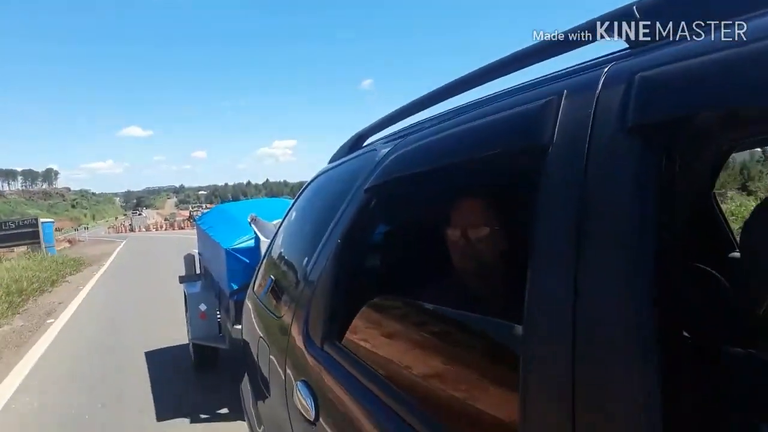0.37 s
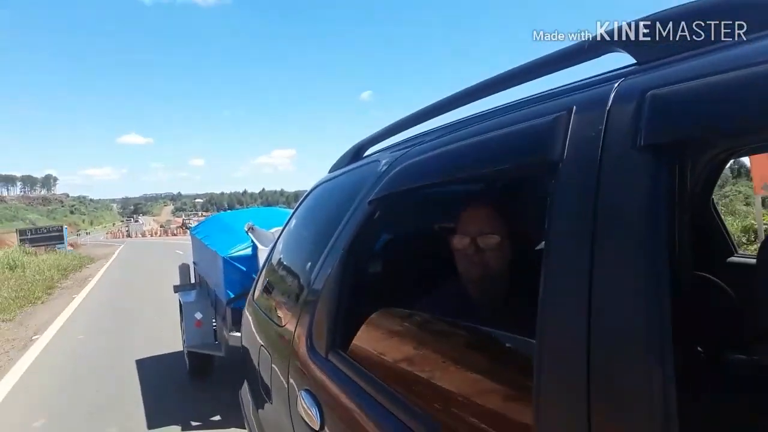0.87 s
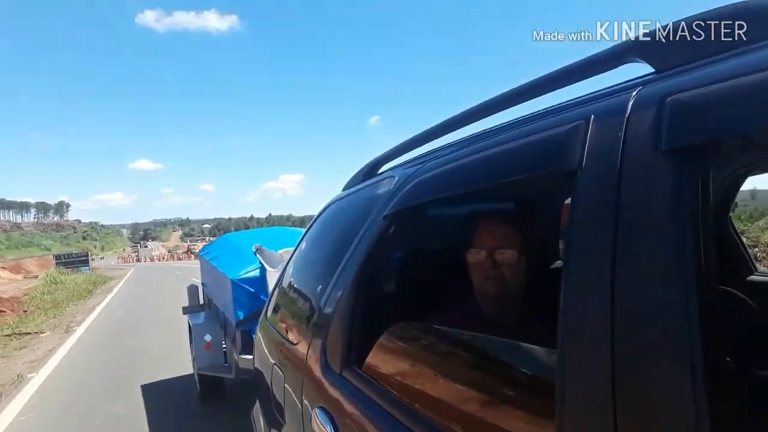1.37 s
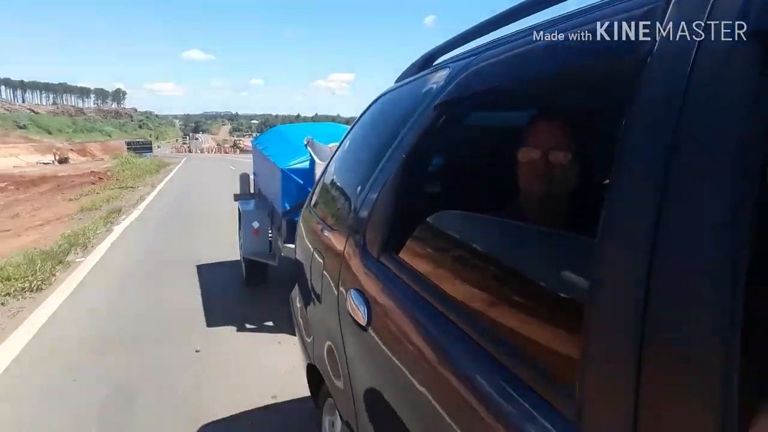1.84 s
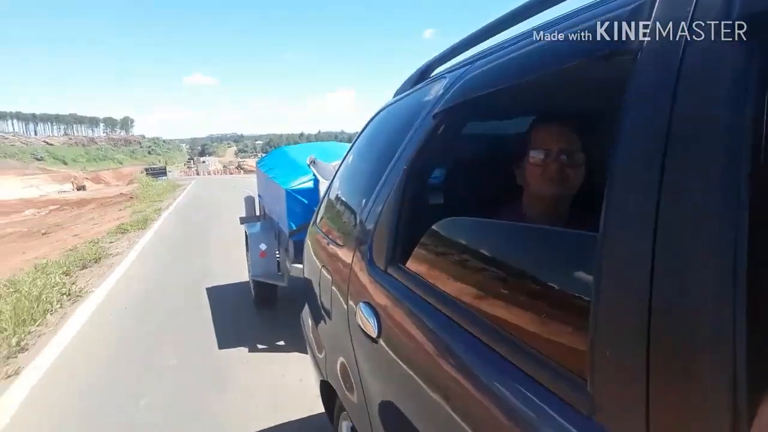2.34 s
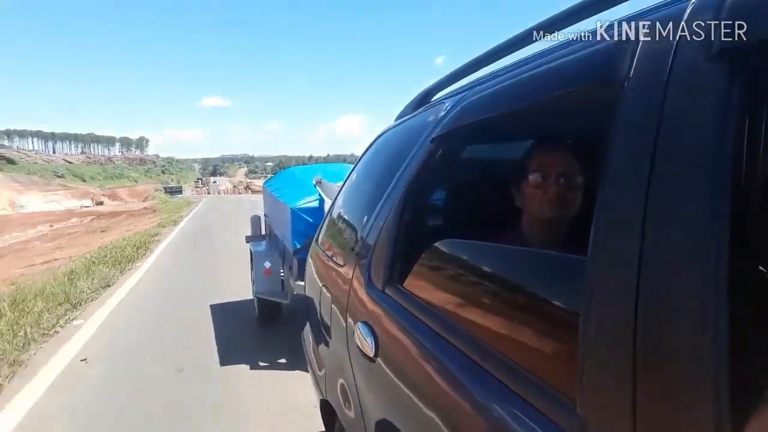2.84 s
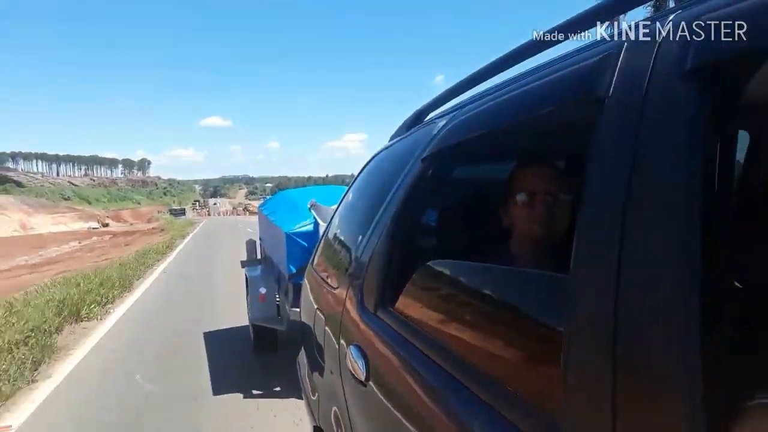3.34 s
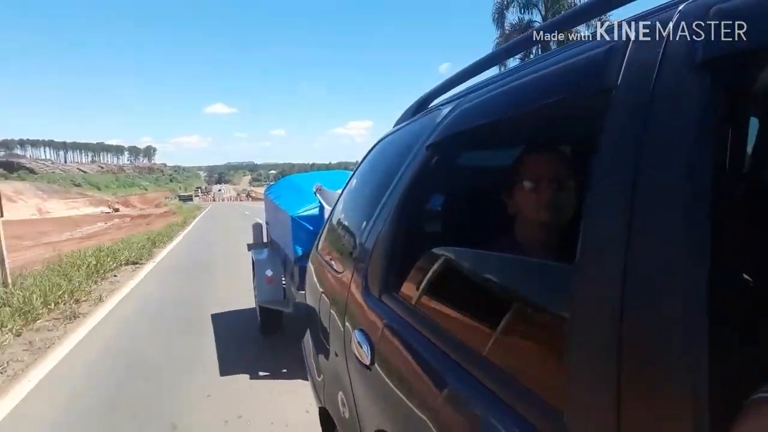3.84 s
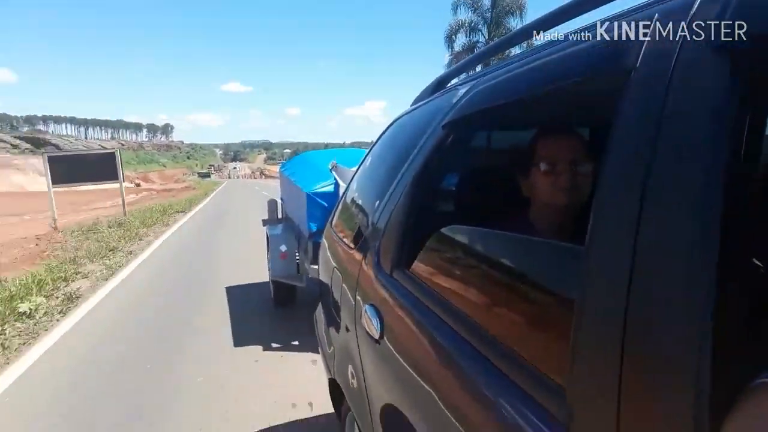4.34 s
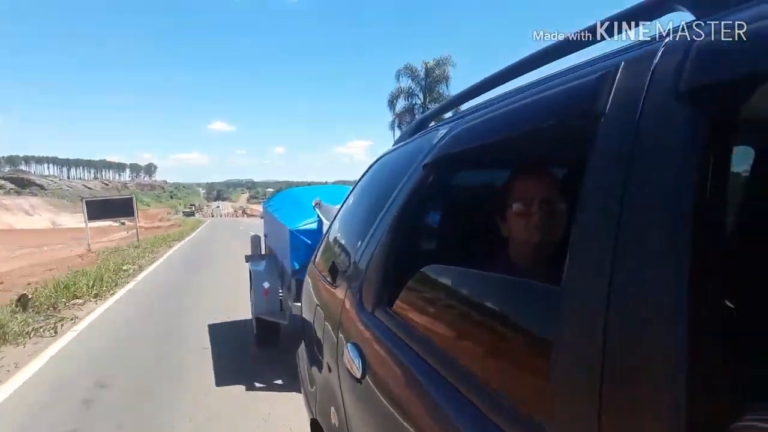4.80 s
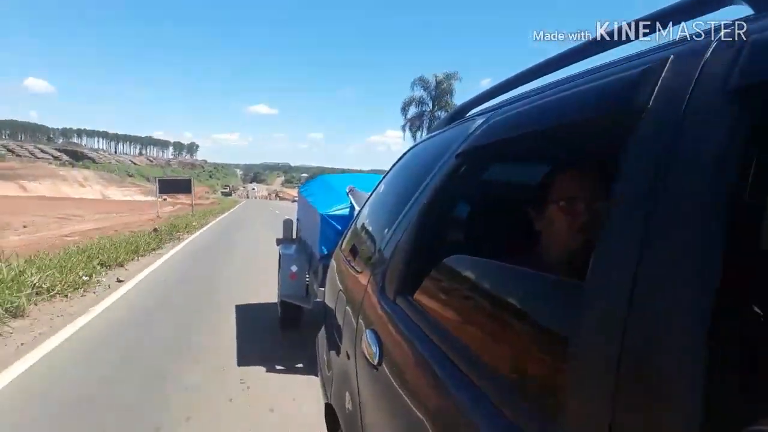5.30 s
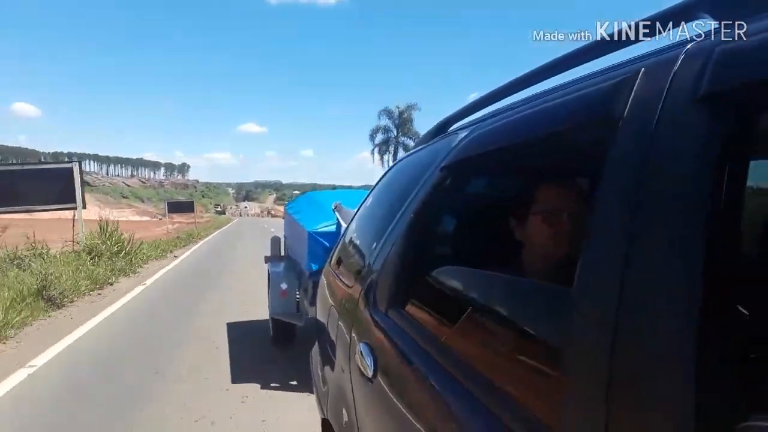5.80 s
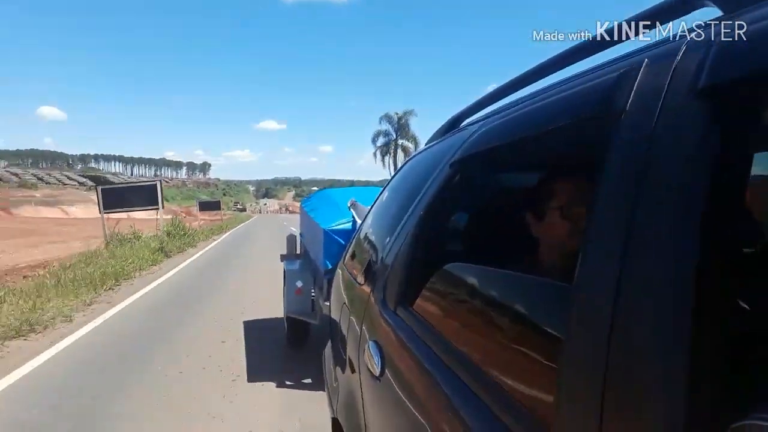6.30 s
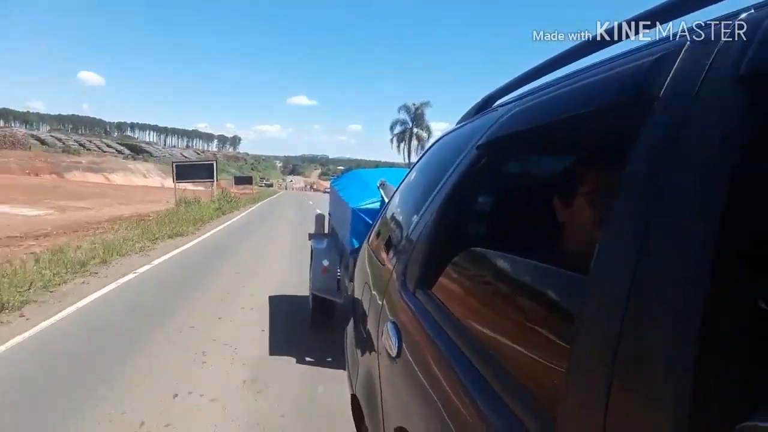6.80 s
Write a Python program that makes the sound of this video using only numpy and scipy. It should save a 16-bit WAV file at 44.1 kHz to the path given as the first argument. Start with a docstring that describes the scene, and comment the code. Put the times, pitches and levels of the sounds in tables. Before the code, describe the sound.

A microphone outside a moving car's window takes the full airstream. A dense, bright rush fills the first second, then thins into ragged bursts as heavy low buffeting takes over. Short dips break the flow, and from the middle onward sharp snaps and crackles strike often. Deep rumble lies underneath. Everything is loud, close and flattened by overload, sinking slightly at the very end.

```python
"""A microphone is held out of the window of a moving car, in the airstream along the side.
First a bright rush of small eddies leads; from about 1 s it thins to bursts and the large eddies buffet harder.
Brief lulls dip the stream from then on; from about 3.6 s strong eddies often strike the port, and the rush snaps.
A deep rumble lies under it all, stronger in the later part; at the very end the buffet sinks.
All of it is shaped noise; the pressure overdrives the input stage, which cuts every swing off at one height."""
import sys
import numpy as np
from scipy import signal
from scipy.fft import rfft, irfft
from scipy.io import wavfile
from scipy.ndimage import uniform_filter1d

SR = 44100
rng = np.random.default_rng(int(sys.argv[2]) if len(sys.argv) > 2 else 0)


def decibels_to_gain(level_db):
    """Convert a level in decibels to a linear amplitude gain (20 dB per decade)."""
    exponent = np.asarray(level_db, float) / 20
    return 10 ** exponent


def dump_mix(stems):
    """Bounce the given channels to the path in sys.argv[1] as a 16-bit WAV at rate SR."""
    frames = np.atleast_2d(stems).T  # one column per channel
    limited = np.clip(frames, -1, 1)  # hard clip at full scale
    pcm = np.round(limited * 32767).astype(np.int16)
    wavfile.write(sys.argv[1], SR, pcm)


N = 315756   # samples
FULL_EDDY_DB = -34   # eddy strength at which the rush has its plain spectrum


def rms_one(x):
    """Scale to rms 1."""
    return x / np.sqrt(np.mean(x ** 2) + 1e-20)


def in_time(rows):
    """Columns of a curve at every sample."""
    s, *columns = np.transpose(rows)
    return [np.interp(np.arange(N) / SR, s, column) for column in columns]


def at_hz(points, hz):
    """A spectrum read on a log-frequency axis."""
    points_hz, values = np.transpose(points)
    return np.interp(np.log(hz + 1), np.log(points_hz), values)


def drift(rate_hz):
    """Random wander: noise through a double one-pole low-pass, run in for 1 s; rms 1."""
    r = np.exp(-2 * np.pi * rate_hz / SR)
    wander = signal.lfilter([1], [1, -2 * r, r * r], rng.standard_normal(N + SR))
    return rms_one(wander[SR:])


def coloured(white, gain):
    """Noise shaped by a gain per frequency."""
    hz = np.fft.rfftfreq(len(white), 1 / SR)
    return irfft(rfft(white) * gain(hz), len(white))


def band_noise(low_hz, high_hz):
    """Noise between two edges; rms 1."""
    band = signal.butter(2, [low_hz, high_hz], "band", fs=SR, output="sos")
    return rms_one(signal.sosfilt(band, rng.standard_normal(N)))


# Spectrum of the large eddies at the port.
# Each row: frequency in Hz, relative density in dB per Hz.
BUFFET_SPECTRUM = [(35, -46), (60, -20), (129, -1.5), (329, -0.5), (643, -3.5), (1080, -15), (1240, -32),
                   (2500, -29), (3250, -40.5), (5500, -120)]


def buffet(level_db, flare):
    """Large eddies push on the port: lumpy low pressure swings that flare mildly with the small eddies."""
    white = rng.standard_normal(N)
    swings = rms_one(coloured(white, lambda hz: decibels_to_gain(at_hz(BUFFET_SPECTRUM, hz))))
    lumps = decibels_to_gain(level_db + 1.5 * drift(5.9))   # wander of 1.5 dB rms, pole corners at 5.9 Hz
    return lumps * swings * flare ** 0.31


# Spectrum of the rush of small eddies past the port.
# Each row: frequency in Hz, relative density in dB per Hz.
RUSH_SPECTRUM = [(90, -21), (200, 0.5), (400, 0.5), (770, 1), (1700, -2.5), (2800, -9), (4500, -18),
                 (7800, -28.5), (9000, -29), (12000, -31), (15500, -39)]
# How far each part of the rush follows the strength of the small eddies.
# Each row: band centre in Hz, share (dB of rush per dB of eddy strength).
RUSH_FOLLOWING = [(250, 0.1), (700, 0.69), (1500, 0.58), (3000, 0.78), (6000, 1.13), (14000, 1.6)]


def rush(eddy_db):
    """Small eddies hiss past in one noise; the higher bands follow the eddies most, so bursts are brighter."""
    snaps = decibels_to_gain(2.74 * rng.exponential(1, N))   # now and then a sharp pressure step
    white = rms_one(rng.standard_normal(N) * snaps)
    white = rms_one(coloured(white, lambda hz: decibels_to_gain(at_hz(RUSH_SPECTRUM, hz))))
    centres = [hz for hz, share in RUSH_FOLLOWING]
    total = 0
    for k, (centre_hz, share) in enumerate(RUSH_FOLLOWING):
        # overlapping slopes that add up to one
        slope = list(zip(centres, np.arange(len(centres)) == k))
        band = coloured(white, lambda hz: at_hz(slope, hz))
        total = total + decibels_to_gain(share * (eddy_db - FULL_EDDY_DB)) * band
    return decibels_to_gain(-20.5) * total


# Strong eddies striking the microphone port.
# Each row: start in seconds, strength in dB before flutter and limit, time scale of dying away in seconds.
EDDY_STRIKES = [(1.8161, -42, 0.008), (2.153, -35.5, 0.006), (2.344, -40, 0.004), (2.525, -40, 0.017),
                (3.622, -31.5, 0.0078), (3.666, -33.5, 0.0038), (3.805, -38, 0.01), (4.03, -35, 0.02),
                (4.076, -34.5, 0.012), (4.346, -30.5, 0.01), (4.429, -37.5, 0.0054), (4.543, -36, 0.004),
                (4.564, -40, 0.012), (4.61, -35, 0.0067), (4.6645, -39, 0.0056), (4.779, -42.5, 0.012),
                (4.793, -36, 0.004), (4.828, -44.5, 0.0049), (4.89, -35, 0.0065), (5.006, -44.5, 0.0032),
                (5.088, -44, 0.02), (5.162, -34, 0.0096), (5.206, -44, 0.006), (5.224, -43, 0.015),
                (5.274, -39.5, 0.013), (5.3515, -44, 0.0049), (5.378, -31, 0.0071), (5.4624, -37.5, 0.0088),
                (5.5516, -44.5, 0.006), (5.697, -37, 0.01), (6.046, -31, 0.005), (6.145, -44, 0.005),
                (6.251, -37, 0.0083), (6.497, -37, 0.0057), (6.627, -32, 0.0053), (6.7375, -33, 0.004)]


def strikes():
    """Strong eddies hit the port: each rises within about a fifth of its time scale, then dies away."""
    t, struck = np.arange(N) / SR, np.zeros(N)
    for start, strength_db, length in EDDY_STRIKES:
        near = slice(int(start * SR), int((start + 0.05) * SR))
        after = (t[near] - start) / length
        struck[near] += decibels_to_gain(strength_db) * np.clip(4.9 * after, 0, 1) * np.exp(-after ** 2)
    return struck * decibels_to_gain(3.6 * drift(430))   # quick flutter, 3.6 dB rms


def ticks():
    """Needle-thin flutters: brief random lifts of the eddy strength, in dB before the restlessness."""
    per_second, mean_lift_db, half_length_s = 110, 6.0, 0.00062
    born = (rng.random(N) < per_second / SR) * rng.exponential(1, N)
    t = np.arange(-0.004 * SR, 0.004 * SR) / SR
    return mean_lift_db * np.convolve(born, np.exp(-(t / half_length_s) ** 2), "same")


# Chance wander of the small eddies, from slow to quick.
# Each row: corner rate in Hz, spread in dB at a restlessness of 1.
EDDY_WANDER = [(20, 1.5), (150, 6), (500, 7), (1200, 2)]


def small_eddies(mean_db, restless):
    """Strength of the small eddies in dB: restless chance around the mean, plus strikes, up to a limit."""
    strongest_db = -28
    wander_db = sum(spread_db * drift(rate_hz) for rate_hz, spread_db in EDDY_WANDER)
    chance_db = np.clip(restless, 0, 2) * (ticks() + wander_db)
    free = np.hypot(decibels_to_gain(mean_db + chance_db), strikes()) / decibels_to_gain(strongest_db)
    limited = free / np.sqrt(1 + free ** 2)   # eddies grow only so strong
    return strongest_db + 20 * np.log10(limited)


def flares(eddy_db):
    """Brief swells in step with the small eddies, against their own half-second level."""
    flare = decibels_to_gain(0.47 * eddy_db)
    return flare / np.sqrt(uniform_filter1d(flare ** 2, size=SR // 2))


# Brief lulls of the airstream.
# Each row: middle in seconds, depth in dB for the mean small-eddy strength, half length in seconds.
STREAM_LULLS = [(1.073, 8, 0.013), (1.805, 16, .015), (1.934, 10, 0.017), (2.166, 9, .015),
                (2.256, 12, 0.013), (2.433, 9, .015), (2.51, 13, .018), (2.946, 12, 0.0062),
                (3.312, 9, 0.017), (3.592, 10, .015), (3.655, 4, 0.013), (4.065, 10, .006),
                (4.312, 10, .006), (4.385, 10, .006), (4.61, 14, 0.0068), (4.663, 12, 0.013),
                (4.768, 8, 0.0084), (4.814, 13, 0.015), (4.975, 9, .02), (5.143, 10, 0.011),
                (5.19, 12, 0.011), (5.314, 10, .016), (5.34, 8, .008), (5.417, 8, 0.0088),
                (5.686, 14, 0.0073), (6.018, 16, 0.015), (6.208, 15, 0.017), (6.402, 11, 0.0088),
                (6.58, 12, .014), (6.725, 11, 0.0084), (6.774, 6, 0.0083)]


def lulls():
    """The stream slackens for a moment: each lull is a smooth dip, in dB."""
    t = np.arange(N) / SR
    return -sum(depth_db * np.exp(-((t - middle) / half) ** 2) for middle, depth_db, half in STREAM_LULLS)


def roar(level_db, flare):
    """A roar above the buffet: band noise that flares with the small eddies."""
    return decibels_to_gain(level_db) * flare * band_noise(500, 1103)


# Level of the deep rumble.
# Each row: time in seconds, level in dB ahead of the microphone.
DEEP_LEVEL = [(0.0, -41), (1.3, -35.5), (2.8, -41.5), (4.3, -34), (7.16, -32.5)]


def deep_rumble():
    """A low band of noise whose level moves slowly."""
    level_db, = in_time(DEEP_LEVEL)
    return decibels_to_gain(level_db) * band_noise(68.5, 152)


# The airstream past the port, ahead of the microphone and before lulls, wander and flares.
# Each row: time in seconds, buffet level in dB, mean small-eddy strength in dB, roar level in dB.
AIRSTREAM = [(0.0, -26, -29.5, -46), (0.5, -27.5, -31.5, -36), (0.92, -25.5, -31.5, -30),
             (1.06, -21, -44.5, -26), (1.3, -22.5, -44, -23.5), (1.43, -25.5, -30, -29),
             (1.58, -25.5, -35, -27), (1.75, -21, -46.5, -24), (2.05, -21.5, -43.5, -22.5),
             (2.3, -23, -51, -26.5), (2.75, -22, -50, -23.5), (3.3, -22.5, -48.5, -27),
             (3.6, -24, -58, -26), (4.05, -21, -47, -24.5), (4.5, -23, -53.5, -29.5),
             (4.97, -25.5, -66, -35.5), (5.4, -24, -61, -33.5), (5.8, -22.5, -45.5, -29),
             (6.4, -24.5, -48.5, -30.5), (6.75, -25, -55.5, -37), (7.0, -25.5, -48, -33),
             (7.16, -30.5, -58, -38)]


def scene():
    """Pressure at the microphone port: buffet, rush and roar of one airstream over a deep rumble."""
    buffet_db, mean_db, roar_db = in_time(AIRSTREAM)
    dip_db = lulls()
    restless = 0.8 + 0.008 * (FULL_EDDY_DB - mean_db)   # weak eddies are the more restless
    eddy_db = small_eddies(mean_db + dip_db, restless)
    flare = flares(eddy_db)
    large = buffet(buffet_db + 0.21 * dip_db, flare)   # large eddies feel a share of each lull
    pressure = large + rush(eddy_db) + roar(roar_db, flare) + deep_rumble()
    return pressure[None]


def band_limit(x):
    """A steep low-pass at the top of the band."""
    return signal.sosfilt(signal.butter(12, 16790, fs=SR, output="sos"), x)


# Resonance of the cavity behind the microphone port.
# In order: centre in Hz, width in Hz, lift in dB.
PORT_CAVITY = (9000, 1000, 4.0)


def record(dry):
    """Port resonance, a capsule that saturates, bass cut, an input stage with a firm ceiling, top cut."""
    capsule_top, ceiling, knee = 0.36, 0.206, 7   # higher knee = firmer ceiling
    hz, width, lift_db = PORT_CAVITY
    b, a = signal.iirpeak(hz, hz / width, fs=SR)
    cavity = (decibels_to_gain(lift_db) - 1) * signal.lfilter(b, a, dry)
    x = decibels_to_gain(3.5) * (dry + cavity)
    x = capsule_top * np.tanh(x / capsule_top)
    bass_cut = signal.butter(2, 60.0, "high", fs=SR, output="sos")
    x = signal.sosfilt(bass_cut, x) / ceiling
    x = ceiling * x / (1 + np.abs(x) ** knee) ** (1 / knee)
    top_cut = signal.ellip(10, 0.2, 45, 15450, fs=SR, output="sos")
    x = signal.sosfiltfilt(top_cut, x)
    return band_limit(x)


dry = scene()
out = record(dry)
dump_mix(out)
```